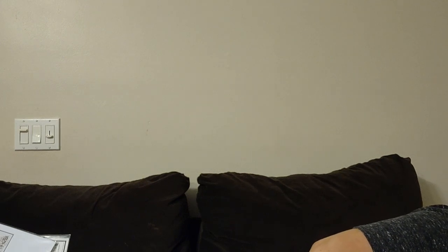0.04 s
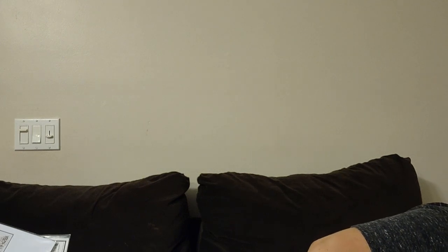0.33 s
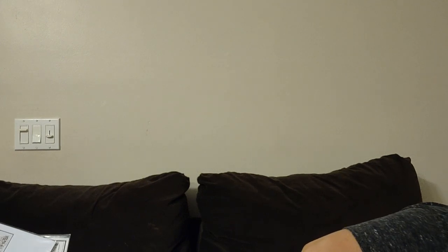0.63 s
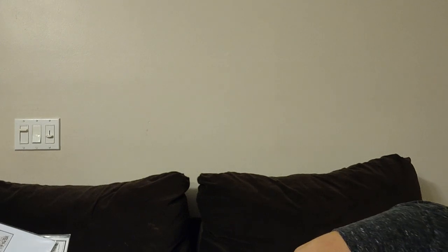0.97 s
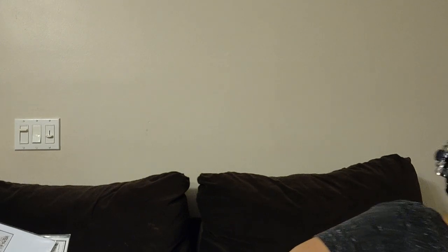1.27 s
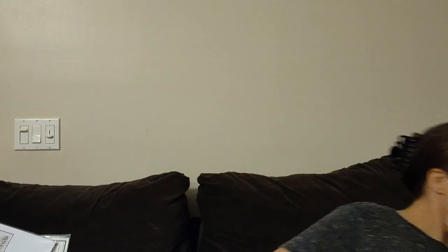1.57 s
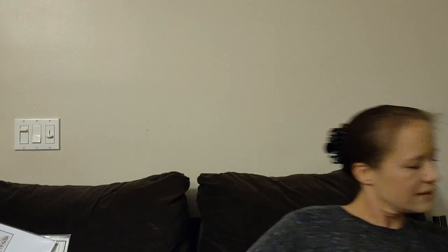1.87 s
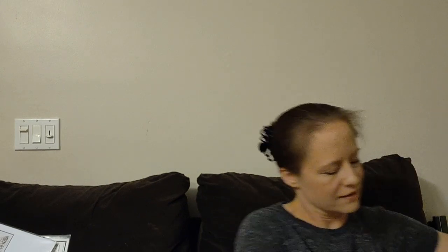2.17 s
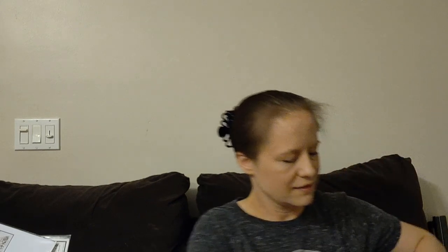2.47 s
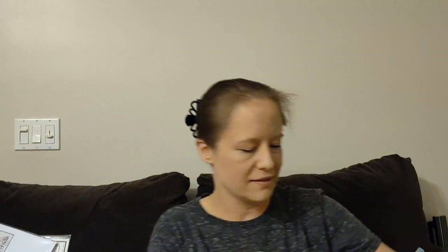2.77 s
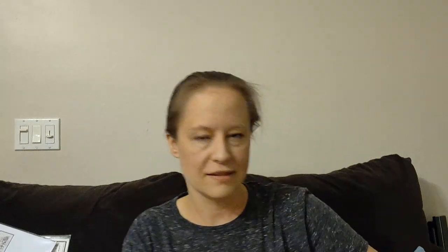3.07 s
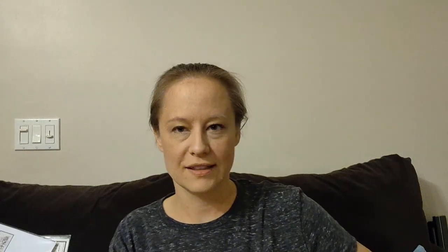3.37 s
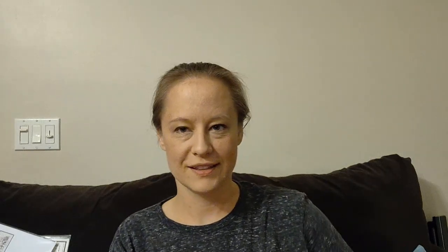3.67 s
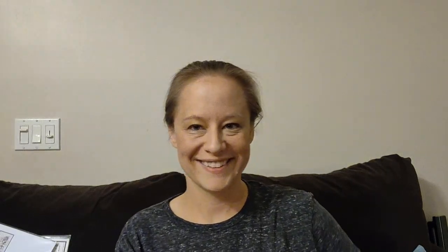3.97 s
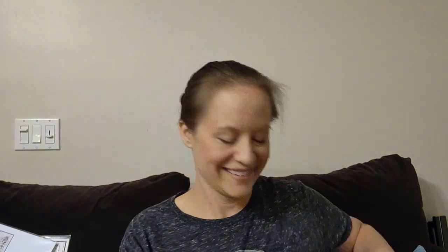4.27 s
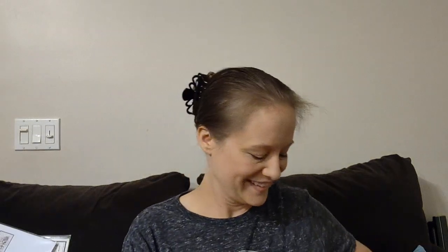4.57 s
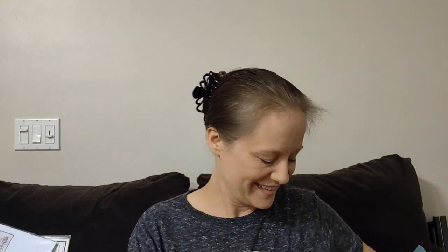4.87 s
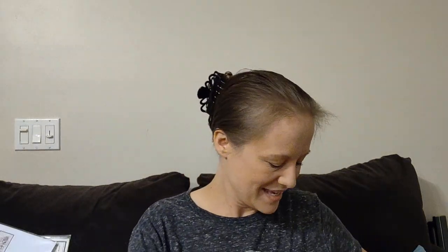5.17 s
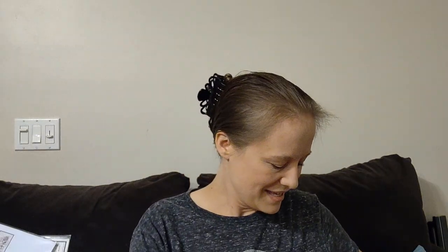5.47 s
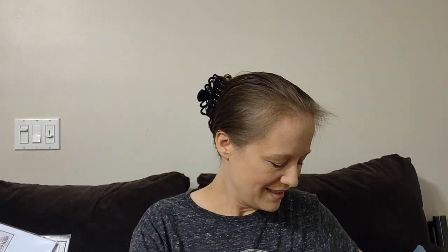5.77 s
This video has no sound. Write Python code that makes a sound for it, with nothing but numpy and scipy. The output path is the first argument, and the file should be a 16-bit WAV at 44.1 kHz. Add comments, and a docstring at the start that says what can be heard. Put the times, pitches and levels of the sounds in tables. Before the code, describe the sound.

Close to the microphone in a small room, cloth and stiff sheets rub and slide against each other. The handling starts lightly, then grows into sharp crackles and raspy strokes, the sheets popping as they bend and now and then nudging a sofa cushion. A short lull leads to one zipping drag across ribbed fabric, then more scattered rustles and clicks, with clothes faintly shifting underneath.

```python
"""Small room, beside a sofa: fabric and stiff craft sheets are picked up, shuffled and put down.
Each stroke is a hiss of tiny slips over a faint rustle of clothes. The sheets flex, snap at
their creases, pop as they buckle and now and then bump the cushions.
One long pull across a ribbed weave sings with the speed of the hand."""
import sys
import numpy as np
from scipy import signal
from scipy.fft import rfft, irfft, next_fast_len
from scipy.io import wavfile
from scipy.ndimage import uniform_filter1d

SR = 44100
rng = np.random.default_rng(int(sys.argv[2]) if len(sys.argv) > 2 else 0)


def inscribe(sig):
    """Save sig as 16-bit PCM at rate SR to the path in sys.argv[1].

    A 1-D sig is mono; a 2-D sig holds one channel per row.
    Samples are clipped to [-1, 1] before scaling.
    """
    pcm = np.round(np.clip(np.atleast_2d(sig).T, -1, 1) * 32767)
    wavfile.write(sys.argv[1], SR, pcm.astype(np.int16))


N = 260785


def gain_of(db):
    """Decibels to amplitude."""
    return 10 ** (np.asarray(db) / 20)


def unit_rms(x):
    """Scale to rms 1."""
    return x / np.sqrt(np.mean(x ** 2) + 1e-20)


def unit_energy(x):
    """Scale to energy 1."""
    return x / np.linalg.norm(x)


def curve_at(points, hz):
    """Interpolate a table over log frequency."""
    freq_hz, value = np.transpose(points)
    return np.interp(np.log(hz + 1), np.log(freq_hz + 1), value)


def add(mix, start_s, sound):
    """Mix a sound in at start_s."""
    part = mix[max(round(start_s * SR), 0):][:len(sound)]
    part += sound[:len(part)]


def colour(x, spectrum, size=2048):
    """Minimum-phase filter from rows of freq_hz, gain_db."""
    hz = abs(np.fft.fftfreq(size, 1 / SR))
    log_gain = np.log(gain_of(curve_at(spectrum, hz)))
    taps = np.fft.ifft(np.exp(np.conj(signal.hilbert(log_gain)))).real
    return signal.fftconvolve(x, taps)[:len(x)]


def drift(cutoff_hz):
    """Low-passed noise, rms 1."""
    size = next_fast_len(N)
    lowpass = np.exp(-(np.fft.rfftfreq(size, 1 / SR) / cutoff_hz) ** 2)
    return unit_rms(irfft(rfft(rng.standard_normal(size)) * lowpass, size)[:N])


def wandering_contact(x, depth_db):
    """The contact wanders: patches of the spectrum swell and fade."""
    bands = signal.stft(x, nperseg=512)[2]
    patches = uniform_filter1d(rng.standard_normal(bands.shape), size=7, axis=0)
    patches = uniform_filter1d(patches, size=5, axis=1)
    return signal.istft(bands * gain_of(depth_db * unit_rms(patches)), nperseg=512)[1][:N]


def friction(spectrum, slips_per_s, spread_db, slide, grip_db, grip_hz, patch_db):
    """Uneven slips over a smooth slide, clumped by a shaky grip; rms 1."""
    sizes = gain_of(spread_db * np.minimum(rng.exponential(1, N), 3.5))
    slips = sizes * rng.choice([-1, 1], N) * (rng.random(N) < slips_per_s / SR)
    drive = unit_rms(slips) + slide * rng.standard_normal(N)
    drive *= gain_of(grip_db * drift(grip_hz))
    return unit_rms(colour(wandering_contact(drive, patch_db), spectrum))


# time_s, level_db
CLOTHES = [(0, -74), (.35, -56.5), (.78, -59), (.95, -81), (1.04, -49), (1.45, -41.5), (1.8, -51),
           (2.14, -42.5), (2.68, -43), (2.87, -67), (3.4, -55), (3.88, -67.5), (4.46, -57.5), (4.57, -72.5),
           (4.83, -78.5), (5.1, -62), (5.65, -60), (5.91, -51)]


def clothes_envelope():
    """Faint rustle of clothes between strokes."""
    return gain_of(np.interp(np.arange(N) / SR, *np.transpose(CLOTHES)))


# start_s, rise_s, hold_s, hiss_db, rasp_db, flex_db, sizzle_db
STROKES = [(0.089, 0.017, 0.0089, -49.5, -60, -60, 4), (0.22, 0.021, 0.051, -33.5, -48, -56.5, 7.5),
           (0.463, 0.059, 0.11, -55.5, -60.5, -51, 18), (0.641, 0.027, 0.0095, -30, -30.5, -24.5, -3),
           (0.726, 0.0086, 0.0025, -34, -61, -61, 9), (1.031, 0.045, 0.11, -27, -30, -33.5, 8),
           (1.193, .005, 0.038, -37, -36.5, -25, -8), (1.23, 0.023, 0.076, -43, -45, -59, 15),
           (1.324, 0.01, .015, -30, -45, -51, 0), (1.363, 0.0074, 0.033, -32.5, -31.5, -41.5, 2),
           (1.524, 0.021, 0.044, -37, -33.5, -32, 4), (1.613, 0.0054, 0.0036, -23.5, -29, -18, -19),
           (1.64, 0.017, 0.05, -42, -41.5, -29, 11), (1.828, 0.028, .01, -43, -45.5, -33.5, -9),
           (1.848, 0.038, 0.045, -21, -25, -33, -12), (1.928, 0.023, 0.018, -26, -26.5, -33.5, -13),
           (2.014, 0.02, 0.034, -40.5, -46, -46, 8), (2.167, 0.041, 0.041, -15.5, -19.5, -21.5, 4),
           (2.26, 0.032, 0.068, -34, -27, -29.5, -3.5), (2.331, 0.064, 0.024, -18, -20.5, -33.5, -7),
           (2.435, 0.027, 0.026, -36.5, -30, -37.5, -1.5), (2.535, 0.053, 0.037, -32.5, -42, -39.5, 6),
           (2.64, .025, 0.062, -44.5, -48, -50.5, 10), (2.974, 0.025, 0.014, -33, -38, -45, 6),
           (2.988, 0.063, 0.059, -19.5, -26, -34, 4), (3.11, 0.026, 0.016, -22, -23.5, -23, 6),
           (3.144, 0.021, 0.034, -21.5, -23.5, -38, -14), (3.239, 0.013, 0.016, -21, -20, -23, -25),
           (3.303, 0.03, 0.02, -40.5, -33, -39.5, -25), (3.605, 0.029, 0.0083, -55, -59.5, -49.5, -1),
           (3.716, 0.032, .008, -35, -46.5, -45.5, -12), (4.012, 0.019, 0.11, -35.5, -37.5, -30.5, 3),
           (4.034, 0.19, 0.12, -22.5, -27.5, -36, 6), (4.344, 0.033, 0.015, -52, -31.5, -24.5, -7),
           (4.623, 0.03, 0.015, -45, -46, -42.5, 1), (4.876, 0.029, .012, -47, -58, -53, -1),
           (4.962, 0.005, 0.036, -41, -48, -42.5, -1), (4.996, 0.027, 0.018, -35.5, -42.5, -36, 8),
           (5.196, 0.016, 0.033, -33, -37, -39.5, 7), (5.227, 0.037, 0.036, -34, -40.5, -38, 9),
           (5.379, 0.057, 0.057, -33, -48.5, -47, 4), (5.553, 0.011, 0.0037, -32, -40, -40.5, 0),
           (5.813, .034, 0.026, -29, -30, -33, 4)]


def stroke_envelope(levels_db, fade_db_per_s, sag_db_per_s=19, settle_db=-16, settle_db_per_s=134.5):
    """Each hand stroke speeds up, holds and fades; the cloth settles more slowly. Powers add."""
    t, power = np.arange(SR) / SR, np.zeros(N)
    for (start_s, rise_s, hold_s, *_), level_db in zip(STROKES, levels_db):
        held_s = np.clip(t - rise_s, 0, hold_s)
        after_s = np.maximum(t - rise_s - hold_s, 0)
        attack = np.minimum(t / rise_s, 1) ** 1.53
        hold = gain_of(level_db - sag_db_per_s * (held_s - hold_s / 2))
        release_db = np.maximum(-fade_db_per_s * after_s, settle_db - settle_db_per_s * after_s)
        add(power, start_s, (attack * hold * gain_of(release_db)) ** 2)
    return np.sqrt(power)


# Friction spectra: freq_hz, gain_db
FIBRE_HISS = [(2500, -39), (3800, -8), (4800, -4.5), (5600, -2), (6500, -1), (7200, -3), (8200, -11),
              (9500, -11), (15500, -26)]
FIBRE_SIZZLE = [(3000, -42), (6500, -15), (8300, 0.5), (10000, -1), (12000, -6.5), (15500, -13)]
EDGE_RASP = [(900, -34.5), (1600, -6.5), (2200, -3.5), (2850, 1), (3200, 1), (3480, 2.5), (3800, -4.5),
             (4300, -6.5), (6000, -30.5)]
SHEET_FLEX = [(200, -30), (370, -5.5), (560, -0.5), (680, 0.5), (1000, 1.5), (1500, 0), (2200, -5.5),
              (4000, -32)]
CUSHION_BUMP = [(30, -35.5), (65, -28), (110, -1.5), (190, 3), (330, 2), (500, -10), (1000, -39.5)]


def handling(hard_stroke_db=-20, snag_growth=1.2, bump_growth=0.54):
    """Fibres hiss and snag, edges rasp, sheets flex and cushions bump as the hands move."""
    hiss_db, rasp_db, flex_db, sizzle_db = np.transpose(STROKES)[3:]
    clothes = clothes_envelope()
    hiss = np.hypot(stroke_envelope(hiss_db, fade_db_per_s=347.5), clothes)
    rasp = np.hypot(stroke_envelope(rasp_db, fade_db_per_s=267), gain_of(-6.5) * clothes)
    flex = np.hypot(stroke_envelope(flex_db, fade_db_per_s=298), gain_of(-3) * clothes)
    # Cushions give with the flexing, less than in proportion.
    bump = gain_of(-29.5) * flex ** bump_growth + landing_envelope()
    # Harder, more edge-on strokes snag more fibres.
    snag_db = hard_stroke_db + sizzle_db + snag_growth * (hiss_db - hard_stroke_db)
    snag = stroke_envelope(snag_db, fade_db_per_s=499)
    out = gain_of(-9) * snag * friction(
        FIBRE_SIZZLE, slips_per_s=900, spread_db=3.5, slide=0.6, grip_db=1.6, grip_hz=90, patch_db=1)
    out += gain_of(-0.5) * hiss * friction(
        FIBRE_HISS, slips_per_s=1800, spread_db=0.5, slide=0.94, grip_db=1.06, grip_hz=150, patch_db=2.5)
    out += gain_of(-2) * rasp * friction(
        EDGE_RASP, slips_per_s=1900, spread_db=1, slide=0.6, grip_db=-1.2, grip_hz=90, patch_db=1.5)
    out += gain_of(-3.5) * flex * friction(
        SHEET_FLEX, slips_per_s=900, spread_db=2, slide=0.71, grip_db=1.5, grip_hz=71.3, patch_db=3)
    out += gain_of(-0.3) * bump * friction(
        CUSHION_BUMP, slips_per_s=260, spread_db=4, slide=0.43, grip_db=-0.4, grip_hz=30, patch_db=-1)
    return out


def burst(decay_s, scatter, size=2048):
    """One sudden release, then a short scatter of smaller ones."""
    t = np.arange(size) / SR
    x = scatter * rng.standard_normal(size) * np.exp(-t / decay_s)
    x[0] += 1
    return unit_energy(x)


# Snap spectra: freq_hz, gain_db
CREASE_CRACK = [(300, -35), (1500, -30), (2800, -19.5), (3600, -7), (5000, -2.5), (6600, 2.5), (8000, -3),
                (10000, -6.5), (15500, -19.5)]
CREASE_BODY = [(40, -34), (90, -23.5), (300, -3), (900, -0.5), (1700, -4), (3000, -2.5), (6000, -26)]
# start_s, level_db, body_offset_db, sizzle_offset_db
SNAPS = [(0.102, -30, -27, -34), (.26, -14, -39, -34), (0.44, -24, -11.5, -31), (.487, -24.5, -4, -33),
         (0.68, -7.5, -29, -30), (.733, -17.5, -17, -30), (1.109, -16, -19, 0), (1.1399, -12, -0.5, -34),
         (1.3298, 3.5, -52, -12.5), (1.6183, -1, -17, -46), (1.683, -20.5, 4.5, -7), (2.189, -17, -24, -30),
         (2.2142, -1.5, -7, -36), (2.2232, -2, -17, -30.5), (2.231, -2, -26, -30), (2.251, 0, -24, -9),
         (2.2614, -2, -5, -39), (2.6665, -18.5, -8.5, -32), (2.9919, -9, -13.5, -32), (3.17, 0, -19, -9),
         (3.1835, 0, -24, -10.5), (3.251, -14, -7.5, -32), (3.628, -38, -4.5, -29), (3.735, -8.5, -27, -40),
         (3.908, -34.5, -24.5, -31), (4.018, -15, -15.5, -34), (4.070, -10, -5, -38),
         (4.129, -9.5, -11, -30), (4.969, -15, -6.5, -28), (4.974, -18, -10, -33), (5.160, -34, -18, -35),
         (5.214, -16, -8, -25), (5.2528, -6.5, -13.5, -24), (5.2635, -9, -16, -34), (5.283, -14, -4.5, -34),
         (5.378, -22.5, -18, -38), (5.565, -12, -32, -33), (5.57, -4.5, -28, -31)]


def crease_snaps(crack_db=7, body_db=9, sizzle_db=19):
    """A crease lets go: dry crack, sizzle on top, duller body of the sheet."""
    out = np.zeros(N)
    for start_s, level_db, body_offset_db, sizzle_offset_db in SNAPS:
        crack = colour(burst(decay_s=0.0015, scatter=0.35), CREASE_CRACK)
        sizzle = colour(burst(decay_s=0.0042, scatter=0.35), FIBRE_SIZZLE)
        body = colour(burst(decay_s=0.007, scatter=0.1), CREASE_BODY)
        snap = (gain_of(crack_db) * unit_energy(crack)
                + gain_of(sizzle_db + sizzle_offset_db) * unit_energy(sizzle)
                + gain_of(body_db + body_offset_db) * unit_energy(body))
        add(out, start_s, gain_of(level_db) * snap)
    return out


# centre_ratio, gain_db
POP_RESONANCE = [(.15, -29), (.45, -20.5), (.7, -2), (1, 6), (1.25, -2.5), (1.6, -22), (2.1, -10.5),
                 (2.8, -14), (7, -44.5)]
# start_s, level_db, centre_hz
POPS = [(0.109, -35.5, 2280), (.406, -34.5, 2440), (0.536, -28, 700), (.562, -25, 800), (.568, -20, 775),
        (0.588, -30, 790), (0.619, -30, 1870), (.634, -30, 2270), (0.655, -13, 796), (0.659, -14.5, 840),
        (0.722, -20, 780), (.734, -17, 830), (.743, -25.5, 790), (1.122, -15, 1410), (1.139, -12.5, 1120),
        (1.167, -17, 910), (1.198, -9.5, 950), (1.206, -14, 700), (1.214, -12, 765), (1.236, -18, 1050),
        (1.62, -7.5, 1070), (1.685, -6, 913), (1.691, -14, 650), (2.214, -7, 1070), (2.249, -12.5, 1180),
        (2.311, -13.5, 640), (3.13, -22.5, 1700), (3.176, -12.5, 1330), (3.262, -9, 1220),
        (3.273, -13, 1260), (3.315, -14, 1250), (3.948, -34, 1010), (4.323, -11.5, 926),
        (4.342, -11.5, 870), (4.362, -10.5, 1000), (4.634, -28.5, 1300), (4.652, -27, 377),
        (5.044, -26.5, 620), (5.119, -33, 624), (5.252, -20, 1400), (5.51, -23, 1460), (5.844, -23.5, 1520),
        (5.87, -19.5, 2200)]


def sheet_pops(gain_db=13.5):
    """A bowed sheet flips over with a short, hollow knock."""
    out = np.zeros(N)
    for start_s, level_db, centre_hz in POPS:
        resonance = [(centre_hz * ratio, db) for ratio, db in POP_RESONANCE]
        knock = colour(burst(decay_s=0.005, scatter=0.07), resonance)
        add(out, start_s, gain_of(level_db + gain_db) * unit_energy(knock))
    return out


# start_s, level_db, pitch_hz
LANDINGS = [(1.393, -40, 104), (2.47, -46, 200), (3.13, -31.5, 147)]


def cushion_thuds(rise_s=0.0097, gain_db=-1):
    """Something lands: the cushion gives softly and swings for a few cycles."""
    out, t = np.zeros(N), np.arange(SR // 5) / SR
    swell = t / rise_s * np.exp(1 - t / rise_s)
    for start_s, level_db, pitch_hz in LANDINGS:
        add(out, start_s, gain_of(level_db + gain_db) * swell * np.sin(2 * np.pi * pitch_hz * t))
    return out


def landing_envelope(rise_s=0.0068, gain_db=-2):
    """The cushions shake briefly after each landing."""
    out, t = np.zeros(N), np.arange(SR // 5) / SR
    swell = t / rise_s * np.exp(1 - t / rise_s)
    for start_s, level_db, _ in LANDINGS:
        add(out, start_s, gain_of(level_db + gain_db) * swell)
    return out


# time_s, rib_rate_hz, level_db
PULL = [(4.068, 183.6, -36), (4.10, 202.7, -30.5), (4.14, 268.8, -31), (4.19, 384, -31.5),
        (4.24, 447.3, -29.5), (4.282, 489.6, -28), (4.321, 465.4, -28.5), (4.361, 395.3, -26),
        (4.392, 348, -39), (4.418, 306, -43.5)]
# harmonic, gain_db
RIB_HARMONICS = [(1, -2.5), (2, 3.5), (3, -26.5), (4, -8), (5, -12.5), (6, -10.5), (8, -17)]
# freq_hz, gain_db
STRETCHED_FABRIC = [(180, -28), (300, -11), (390, -2), (520, 2.5), (680, 1.5), (830, -2.5), (1000, -5),
                    (1200, 6), (1550, 14), (2050, 10.5), (2600, 5), (5000, -8)]


def ribbed_pull(rate_jitter=0.055, jitter_hz=260, flutter_db=3.5):
    """An edge skips over uneven ribs, faster then slower; the stretched fabric radiates the buzz."""
    t = np.arange(N) / SR
    time_s, rib_rate_hz, level_db = np.transpose(PULL)
    rate_hz = np.interp(t, time_s, rib_rate_hz) * (1 + rate_jitter * drift(jitter_hz))
    # Ribs catch early or late, smearing the high harmonics most.
    ribs_crossed = np.cumsum(rate_hz) / SR + 0.032 * drift(140)
    buzz = sum(gain_of(gain_db + flutter_db * drift(jitter_hz)) * np.cos(2 * np.pi * k * ribs_crossed)
               for k, gain_db in RIB_HARMONICS)
    envelope = gain_of(np.interp(t, time_s, level_db)) * (t > time_s[0]) * (t < time_s[-1])
    return colour(unit_rms(buzz) * envelope, STRETCHED_FABRIC)


# freq_hz, t60_s
ROOM_DECAY = [(150, 0.16), (600, 0.16), (1500, 0.2), (3000, 0.21), (6300, 0.047), (12000, 0.12)]


def room(x, predelay_s=0.003, spacing_samples=20):
    """Sparse reflections from near walls, each band dying at its own rate."""
    taps = np.zeros(SR // 2)
    slots = np.arange(round(predelay_s * SR), len(taps) - spacing_samples, spacing_samples)
    taps[slots + rng.integers(0, spacing_samples, len(slots))] = rng.choice([-1., 1.], len(slots))
    hz, t, bands = signal.stft(taps, SR, nperseg=256)
    decay = gain_of(-60 * t / curve_at(ROOM_DECAY, hz)[:, None])
    tail = signal.istft(bands * decay, SR, nperseg=256)[1]
    return signal.fftconvolve(x, unit_energy(tail))[:N]


def scene():
    """Rubbing and small impacts with their reflections, mono."""
    rubbing = handling() + ribbed_pull()
    impacts = crease_snaps() + sheet_pops() + cushion_thuds()
    reflections = room(gain_of(-14.5) * rubbing + gain_of(-6.5) * impacts)
    return (rubbing + impacts + reflections)[None]


# Presence lift, steep drop above: freq_hz, gain_db
MIC_RESPONSE = [(1000, 0.5), (5500, 1.5), (6500, 4.5), (7200, -2), (7900, -13.5), (9000, -18.5),
                (16000, -14.5)]
# freq_hz, gain_db
STILL_AIR = [(18, -45.5), (30, -25), (64, -15.5), (88, 1), (131, -7), (157, -4), (415, -10.5),
             (486, -10.5), (616, -8), (1100, -11.5), (2290, -15), (5590, -12.5), (6380, -13.5),
             (8520, -35), (12000, -24.5), (16000, -28)]


def record(dry):
    """Microphone colour, bass cut, still room air, soft overload, band limit."""
    bass_cut_hz, band_limit_hz, air_db, ceiling = 62, 16200, -64, 0.93
    highpass = signal.butter(4, bass_cut_hz, "high", fs=SR, output="sos")
    heard = signal.sosfilt(highpass, colour(dry[0], MIC_RESPONSE))
    heard += gain_of(air_db) * unit_rms(colour(rng.standard_normal(N), STILL_AIR))
    heard /= (1 + (heard / ceiling) ** 8) ** (1 / 8)
    lowpass = signal.firwin(511, band_limit_hz, window=("kaiser", 9), fs=SR)
    return signal.oaconvolve(heard, lowpass, "same")[None]


dry = scene()
out = record(dry)
inscribe(out)
```